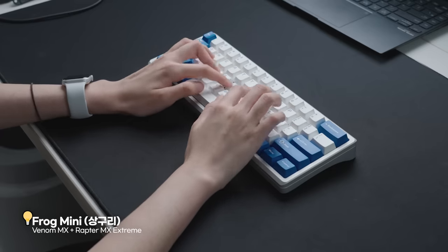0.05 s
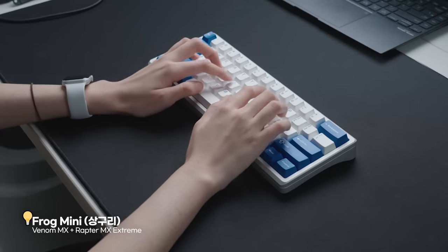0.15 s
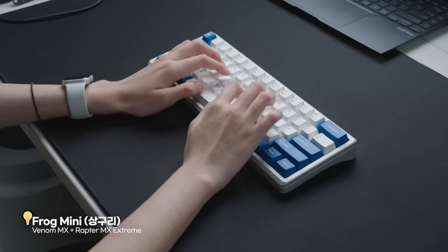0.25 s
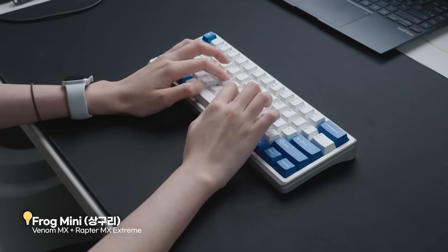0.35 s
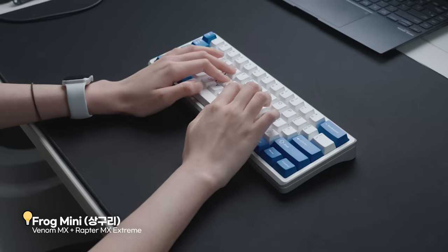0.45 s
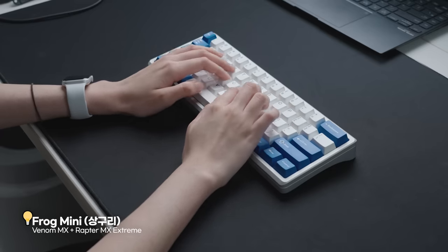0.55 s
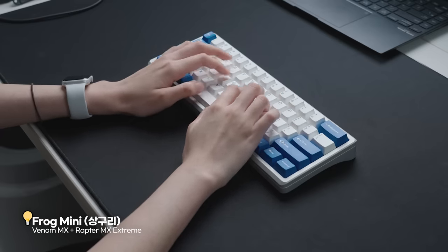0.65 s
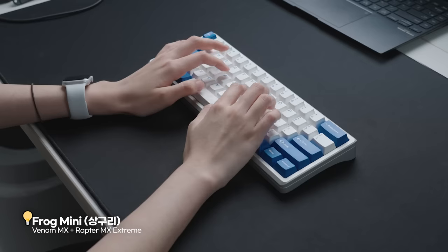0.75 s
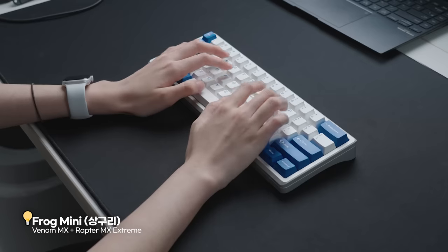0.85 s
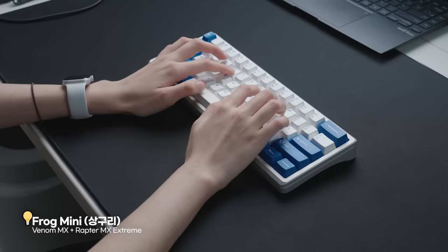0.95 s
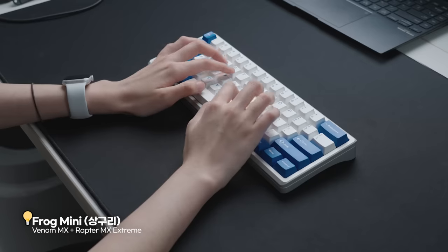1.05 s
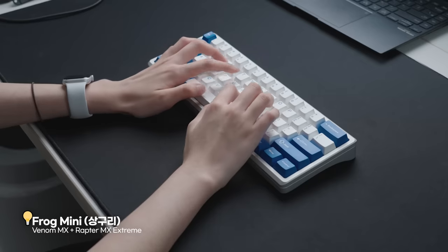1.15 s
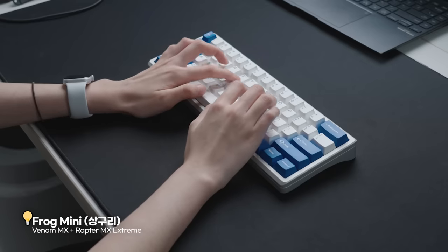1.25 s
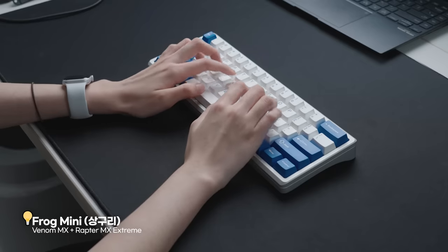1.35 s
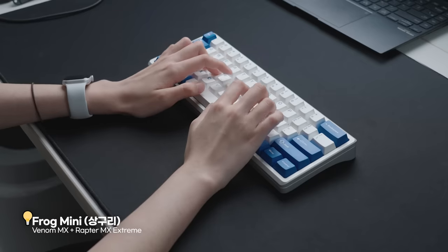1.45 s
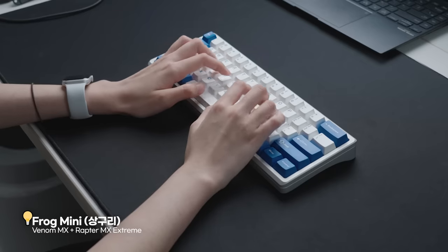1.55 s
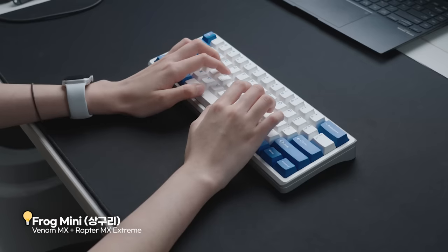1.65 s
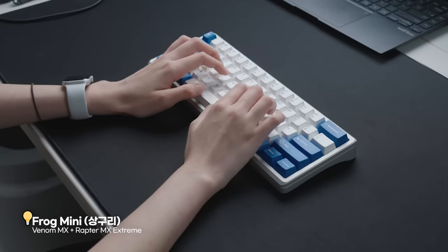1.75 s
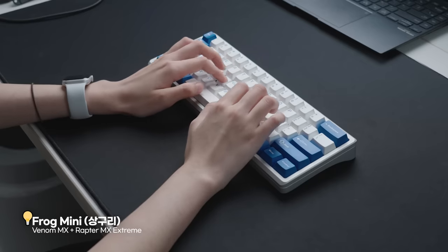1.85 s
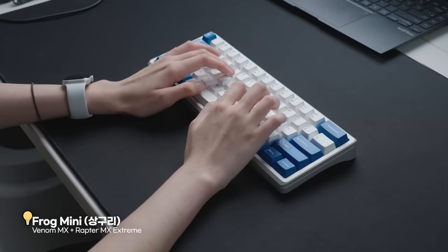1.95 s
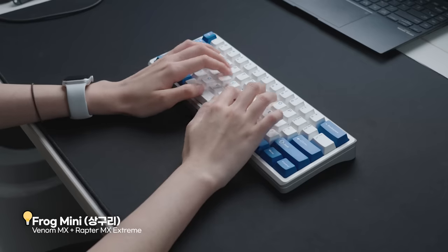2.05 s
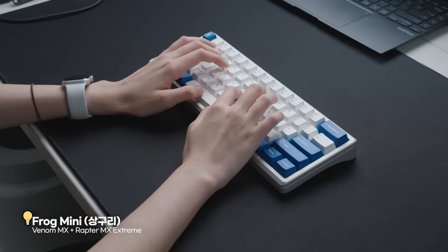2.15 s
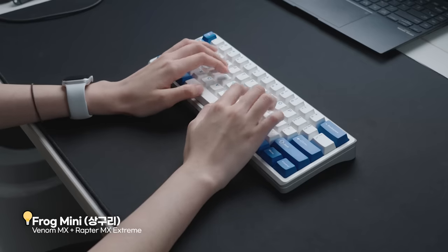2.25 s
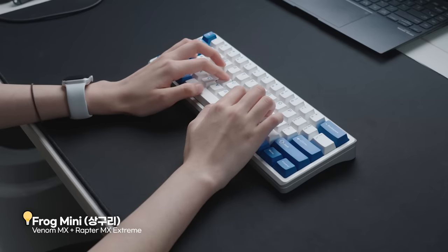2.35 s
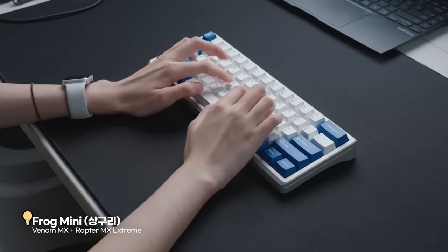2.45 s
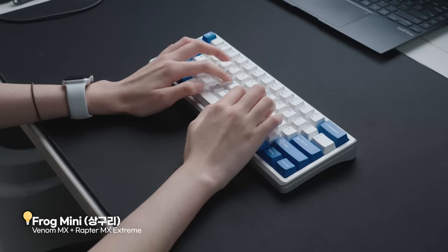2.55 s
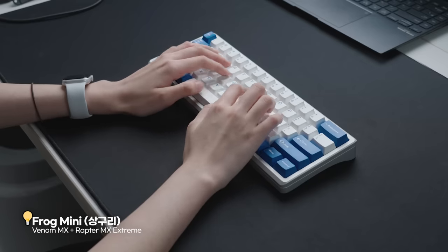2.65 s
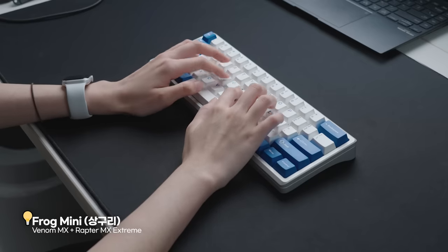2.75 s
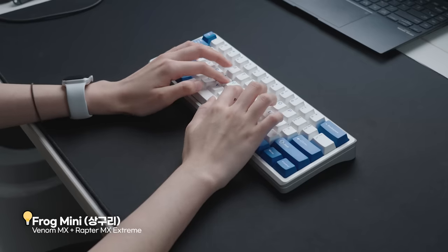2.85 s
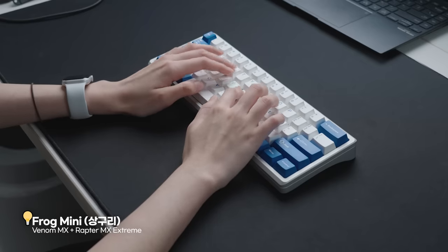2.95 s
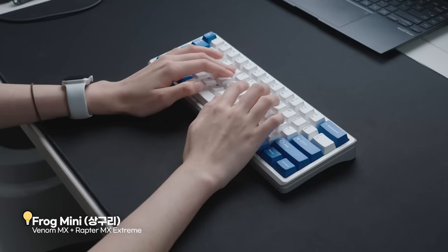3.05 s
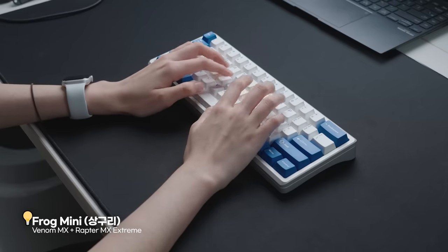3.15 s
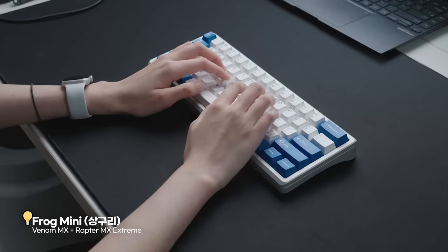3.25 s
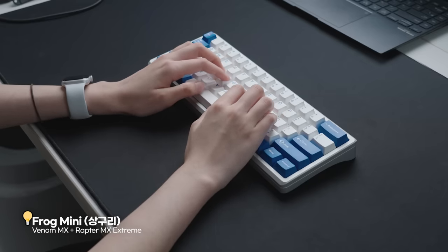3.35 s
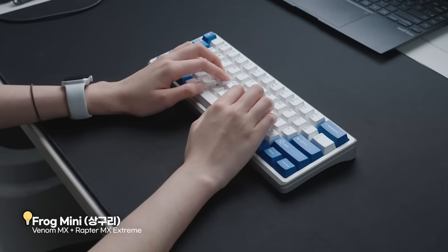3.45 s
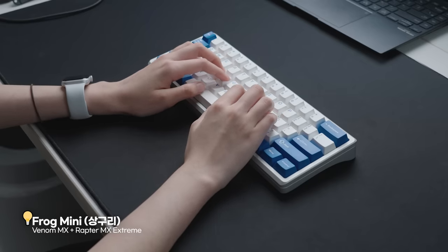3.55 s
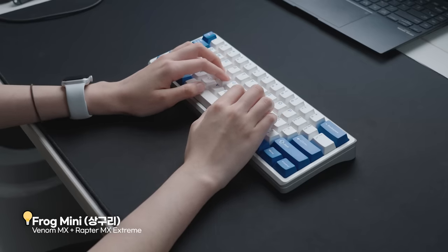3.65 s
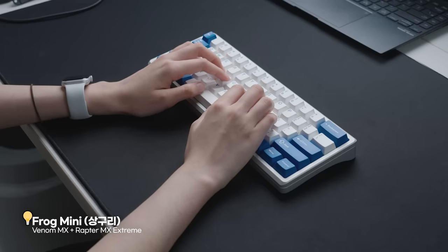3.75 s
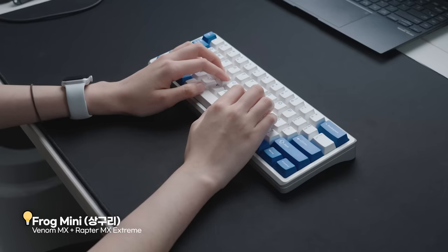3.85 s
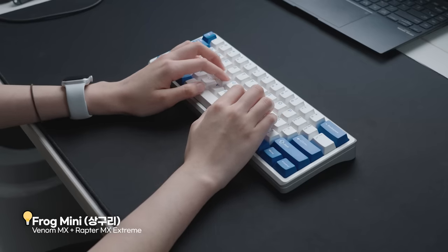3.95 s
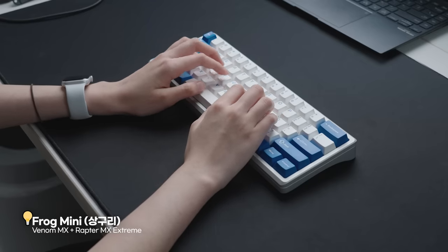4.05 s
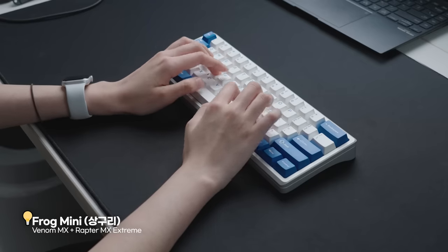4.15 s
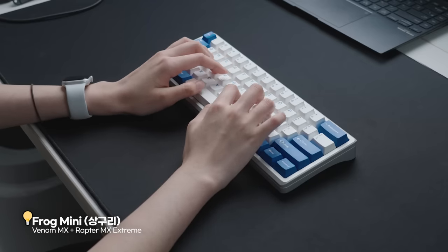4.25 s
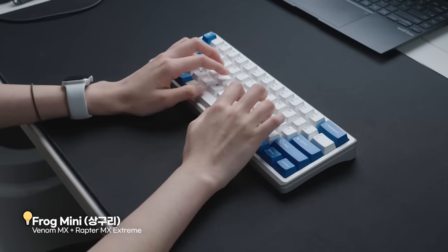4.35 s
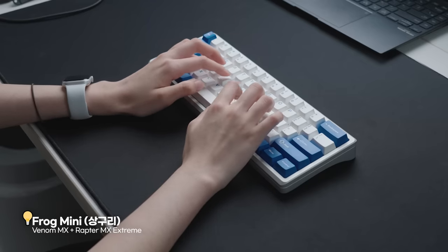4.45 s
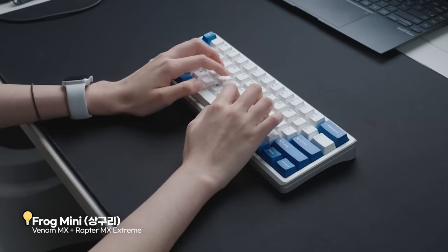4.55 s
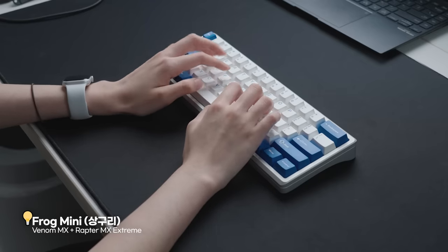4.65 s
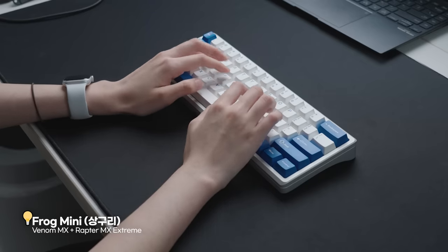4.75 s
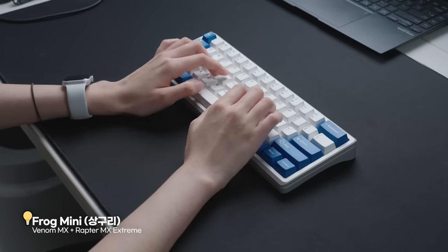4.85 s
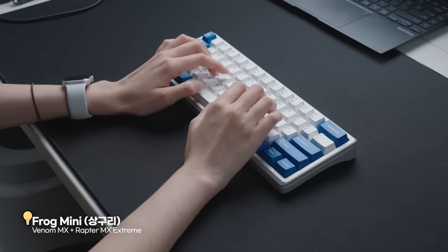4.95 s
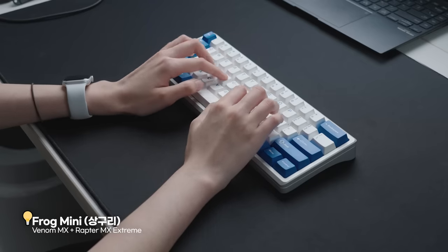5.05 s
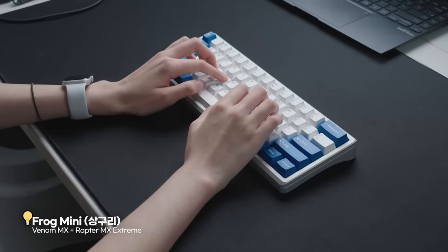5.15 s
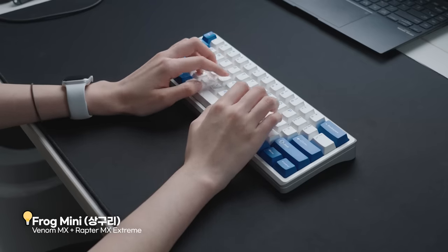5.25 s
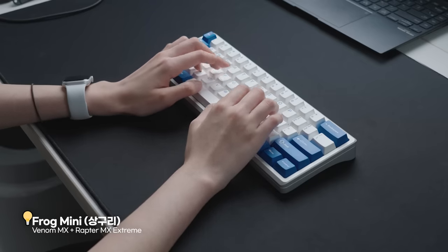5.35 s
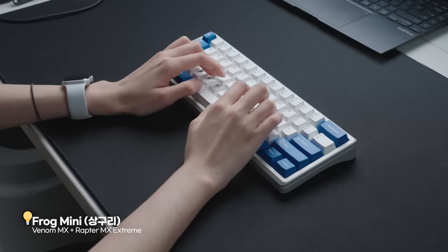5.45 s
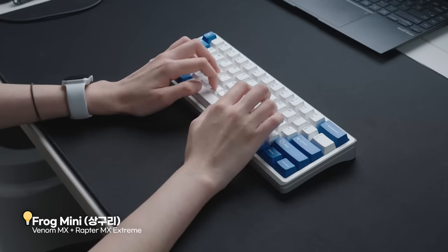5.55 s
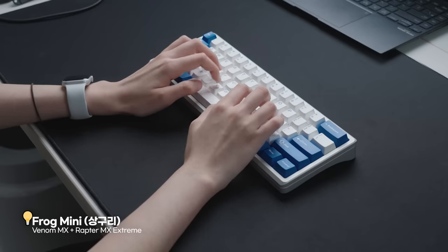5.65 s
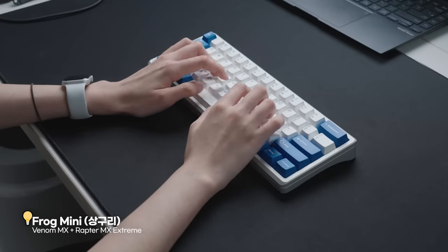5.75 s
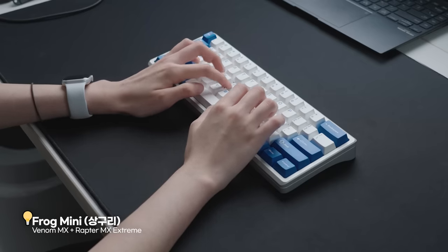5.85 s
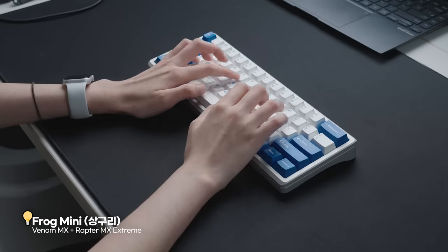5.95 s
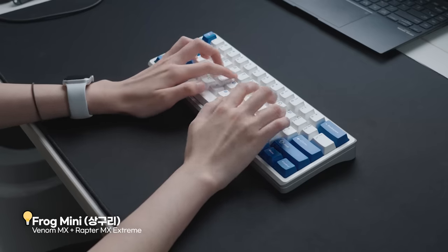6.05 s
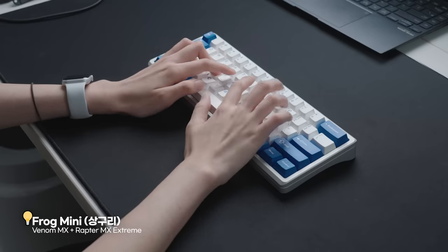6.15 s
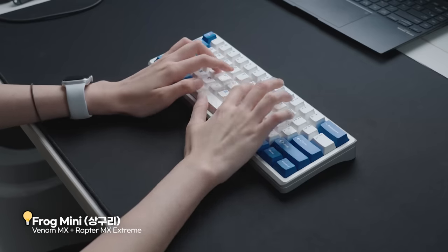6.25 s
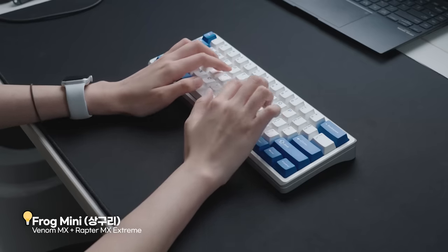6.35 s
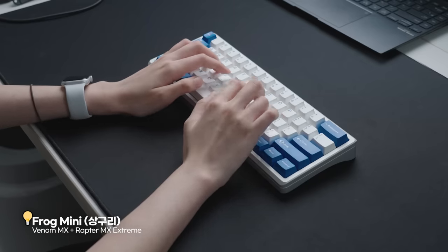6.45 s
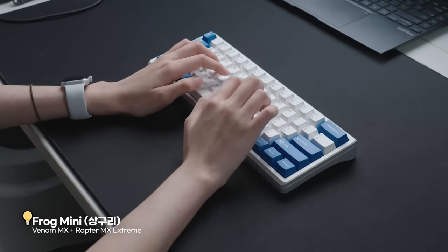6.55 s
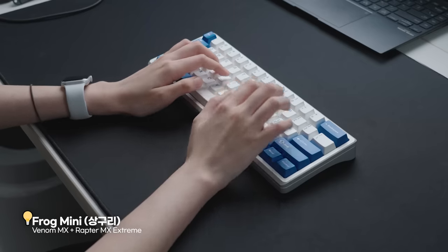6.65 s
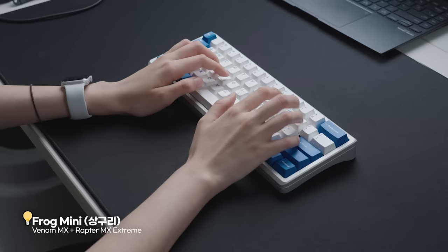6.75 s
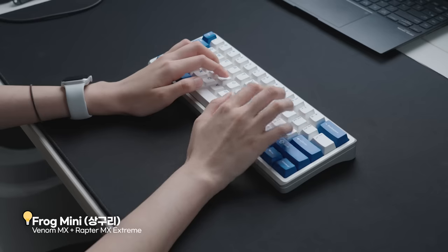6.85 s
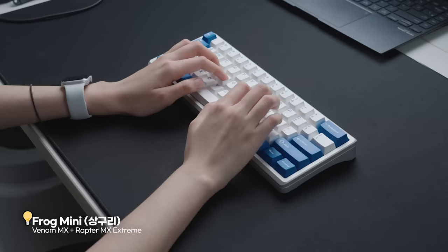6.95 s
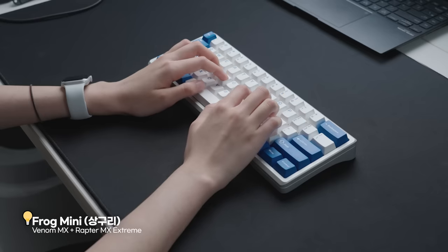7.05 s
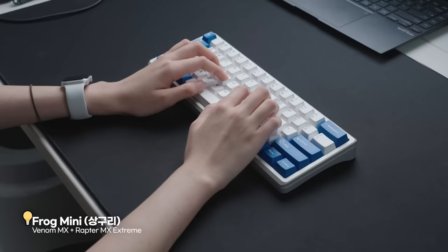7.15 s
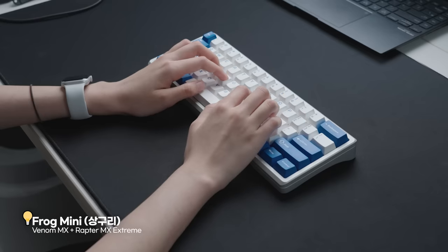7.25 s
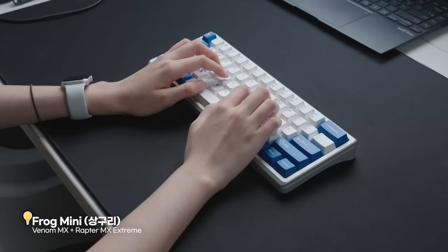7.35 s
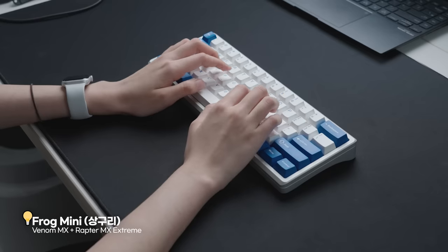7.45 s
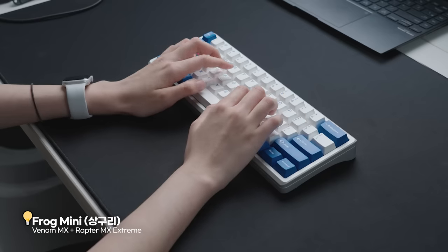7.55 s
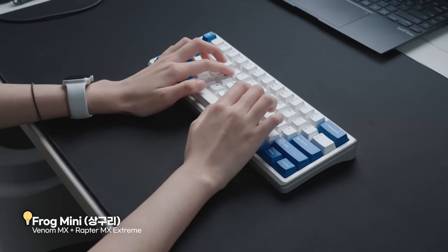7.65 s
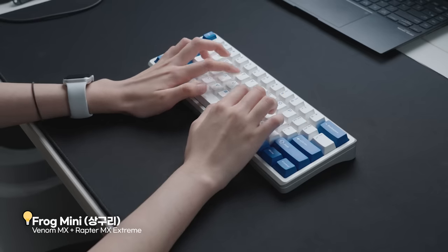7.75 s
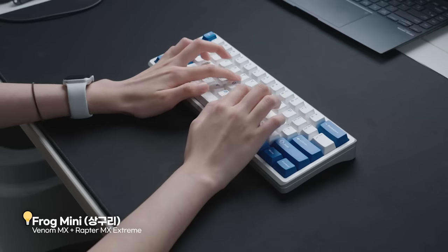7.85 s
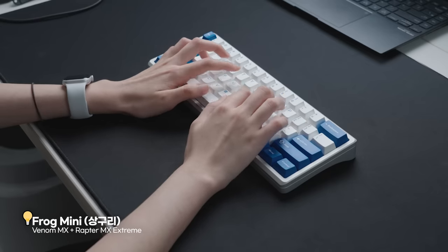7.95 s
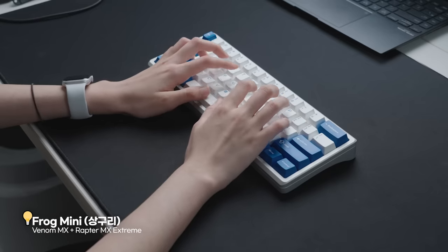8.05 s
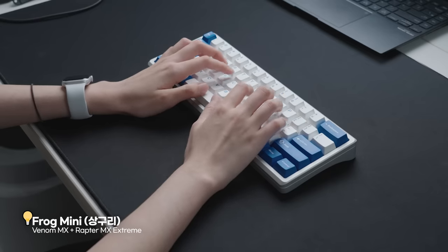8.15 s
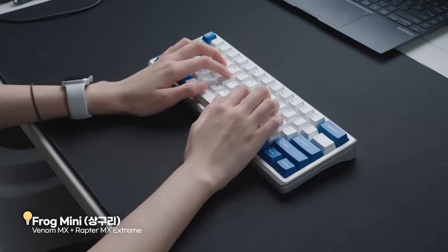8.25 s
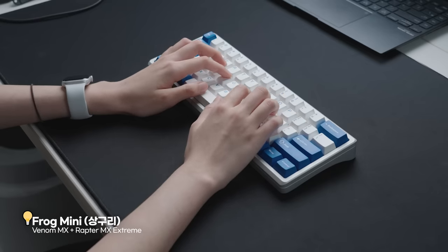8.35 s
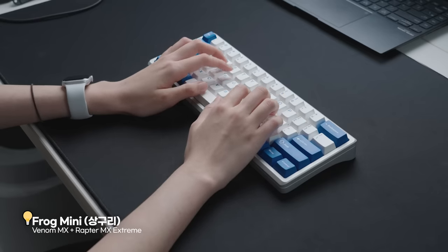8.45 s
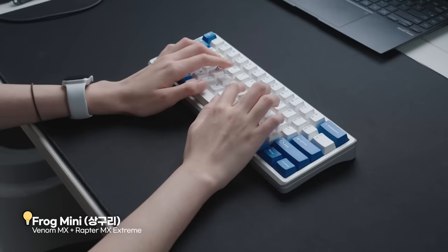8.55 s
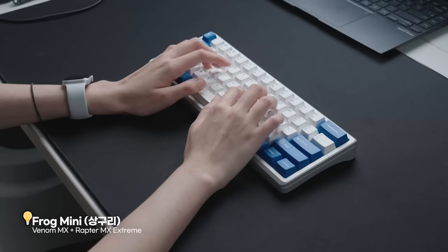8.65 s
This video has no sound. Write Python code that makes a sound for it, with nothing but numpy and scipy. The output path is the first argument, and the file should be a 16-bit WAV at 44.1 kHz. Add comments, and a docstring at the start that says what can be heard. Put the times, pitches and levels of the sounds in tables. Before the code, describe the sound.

Fast typing on a small mechanical keyboard, crisp bright clacks with occasional deeper thocks and brief pauses, recorded close in a quiet room.

```python
"""Soft room hum and hiss, then at once quick typing on a small mechanical keyboard, close to one microphone.
Keycaps clack for a few milliseconds as damped sines over case, stem ticks and a faintly ringing plate.
Long keys thock lower; the desk thumps under the blows. Clacks bounce between desk and ceiling.
Faint finger ticks and one soft rustle are filtered noise and random clicks; hum and hiss are shaped noise."""
import sys
import numpy as np
from scipy import signal
from scipy.fft import rfft, irfft
from scipy.io import wavfile
from scipy.ndimage import uniform_filter1d

SR = 44100
rng = np.random.default_rng(int(sys.argv[2]) if len(sys.argv) > 2 else 0)


def file_out(sig):
    """Save sig as 16-bit WAV at sys.argv[1]."""
    # one column per channel
    cols = np.atleast_2d(sig).T
    # limit, then scale
    lim = np.clip(cols, -1, 1)
    pcm = np.round(lim * 32767).astype(np.int16)
    wavfile.write(sys.argv[1], SR, pcm)


N = 384111

# room and microphone noise spectrum, relative: freq_hz, level_db
AIR_SPECTRUM = [(12, -53.5), (20, -25), (40, -2), (55, 3), (91, -6), (169, -2), (195, -5.5), (289, -10.5),
                (492, -18), (551, -20.5), (1740, -35), (3200, -36), (6000, -44), (15200, -46.5),
                (16500, -62.5)]
AIR_RMS_DB = -54
# wavering hum tones: freq_hz, width_hz (full, at half amplitude), rms_db
HUM_TONES = [(67.4, 11, -61.5), (117.5, 14, -59), (164.6, 4.6, -71.5), (289, 3.4, -71)]

# landing, return or brush of a small key: start_s, level_db, pitch_hz (nominal), stem_db (relative to cap)
SMALL_KEYS = [(.014,-33,3280,-4),(0.035,-5,3050,-8),(0.0755,-19.5,3300,-10),(.0948,-36,3350,1),(0.1073,-5,3430,-8),(.137,-30,3250,-20),(0.1767,-36.5,3310,-2),(0.1915,-7,3390,-9.5),(0.199,-22.5,3220,-6),(0.243,-30,3250,-11.5),(.2644,-3,2970,-7),(0.2685,-16.5,3040,-10),(.36,-22.5,3060,-10.5),(.379,-9,3240,-7),(.4389,-5,3210,-10),(.4605,-16.5,3180,-8.5),(0.5026,-8,3200,-9.5),(.551,-41,3300,6),(.5942,-14.5,3650,-5),(.6344,-31.5,2900,-8.5),(.6476,-8.5,3260,-6.5),(0.7703,-18.5,3100,-9.5),(0.8825,-9.5,3420,-9.5),(.9491,-7,3350,-10.5),(1.0266,-17,3400,-11.5),(1.0354,-17,2930,-4),(1.107,-14,3000,-7.5),(1.1318,-3,3240,-7.5),(1.185,-9.5,3140,-8.5),(1.219,-18,3130,-17),(1.2552,-26,3200,-2.5),(1.272,-17.5,3030,-10),(1.2831,-15.5,3630,-10),(1.3535,-14.5,2910,-8),(1.3605,-11.5,3430,-8.5),(1.392,-35,3250,-11),(1.4211,-10.5,3340,-9.5),(1.4377,-20.5,3000,-6),(1.4652,-7,3220,-9),(1.5368,-32.5,3300,-14.5),(1.5461,-4.5,3100,-9.5),(1.5831,-14.5,3170,-13),(1.654,-19.5,3040,-11),(1.708,-9,3250,-11.5),(1.7713,-4.5,3060,-7.5),(1.799,-30.5,2900,-20),(1.8466,-33,3300,-8),(1.8574,-18.5,2700,-6.5),(1.8654,-7.5,3200,-11.5),(1.9278,-17,3230,-3.5),(1.9453,-22,3200,-18),(1.964,-16.5,3230,-6),(2.014,-9.5,3170,-10.5),(2.0253,-7.5,3180,-9.5),(2.1012,-37,3600,5),(2.1116,-18,3040,-13),(2.1272,-16,3730,-4.5),(2.1643,-31,3080,-15.5),(2.235,-18,3200,-11.5),(2.2548,-9.5,3230,-9),(2.3196,-24,3510,8),(2.3362,-7,3220,-6.5),(2.414,-5.5,3130,-9.5),(2.4756,-9,3010,-14.5),(2.5327,-37,3500,7.5),(2.5468,-4,3460,-8.5),(2.6151,-17,3040,-7),(2.6657,-35.5,3250,-4),(2.6837,-4.5,3200,-5),(2.7667,-16.5,3100,-8.5),(2.8127,-13,3460,-4.5),(2.8342,-31,3300,-5),(2.8686,-9.5,3280,-11),(2.8822,-12,3240,-13),(2.9617,-14.5,3000,-12.5),(2.9923,-20,3560,-5),(3.0474,-7,3170,-11.5),(3.0699,-18,3130,-3),(3.1745,-23.5,3020,-17),(3.1852,-25.5,3000,-8),(4.1979,-32,3600,-1),(4.2169,-8,3160,-7.5),(4.2804,-6,3170,-8.5),(4.3142,-21,3120,-16.5),(4.3267,-36.5,3270,-20.5),(4.3493,-10,3150,-5),(4.3974,-20.5,3160,-7),(4.446,-16.5,3240,-12),(4.4597,-5,3190,-12),(4.5388,-22,3500,-1),(4.5545,-28,2960,-20),(4.5668,-8.5,3180,-7.5),(4.6404,-14.5,3330,-13),(4.694,-21,3200,-15),(4.699,-2.5,3060,-9),(4.7902,-6.5,3380,-10.5),(4.814,-24.5,3470,2),(4.832,-8.5,3150,-7),(4.8588,-36,3300,-14),(4.8884,-23,3480,-5),(4.902,-7,3200,-8.5),(4.9638,-15.5,2830,-8),(4.9701,-12.5,3130,-14),(5.0298,-5.5,3150,-8.5),(5.0578,-16.5,3140,-0.5),(5.0968,-11,3300,-14),(5.1542,-4,3260,-11.5),(5.2324,-13,3250,-18.5),(5.2515,-20,3050,-23.5),(5.3466,-10,3270,-15.5),(5.3938,-8.5,3160,-6.5),(5.4174,-18,3040,-12.5),(5.4542,-34.5,3300,-5),(5.4713,-14,2810,-6),(5.476,-3.5,3180,-9),(5.5477,-4.5,3040,-7.5),(5.5624,-21,3400,-20.5),(5.611,-14,3170,0.5),(5.6141,-15,3230,-18),(5.6258,-8,3160,-11),(5.6927,-5.5,3070,-7),(5.6957,-12,3260,-10),(5.747,-34,3300,-1.5),(5.7737,-4.5,3270,-8),(5.8377,-22.5,3000,-25),(5.872,-25,3070,-17),(5.878,-40,3170,-0.5),(5.9113,-11.5,3640,-2),(5.9452,-8.5,3220,-6.5),(5.9495,-10.5,2840,-1.5),(6.0127,-13.5,2600,-6),(6.0237,-32.5,3310,-3),(6.0503,-15,3360,-10),(6.061,-32,3300,-15.5),(6.0914,-8,3300,-8),(6.1235,-21,3080,-14.5),(6.151,-26,3220,-2.5),(6.1752,-3.5,3180,-9),(6.1892,-21.5,3250,-10.5),(6.252,-42,3290,-1),(6.2664,-8.5,3300,-9.5),(6.3044,-26,3200,-21),(6.3662,-19,3150,-9),(6.4876,-19.5,2870,2.5),(6.508,-11.5,3160,-12.5),(6.5725,-17,2660,-9),(6.7707,-34.5,3250,-4),(7.089,-42.5,3330,-5),(7.5,-48,3300,-1),(7.5493,-9.5,3360,-11.5),(7.6048,-6,3170,-8),(7.6256,-15.5,3250,-16),(7.6656,-31.5,3600,0.5),(7.671,-16.5,3230,-14),(7.6854,-11.5,3270,-9.5),(7.7249,-28.5,3380,2),(7.759,-6.5,3290,-4),(7.8418,-16.5,3140,-4),(7.849,-33.5,3180,3),(7.86,-6.5,3320,-23),(7.9399,-22.5,3020,-12),(7.9952,-11,3520,-7),(8.0702,-12.5,2880,-8),(8.2577,-39,3500,-10),(8.5663,-33.5,3400,0),(8.5863,-6,3200,-9),(8.6424,-31,3400,1),(8.6599,-10,3250,-7),(8.7012,-25,3420,-9)]
# keycap modes: pitch_ratio, level_db
CAP_MODES = [(0.822, -6.5), (1, 14), (1.2, -3)]
# keyboard case modes: freq_hz, level_db, t60_s
CASE_MODES = [(890, -8, 0.024), (1465, 11.5, 0.0046), (1910, -1, 0.021), (2520, -17.5, .005)]
# key stem modes: freq_hz, level_db, t60_s
STEM_MODES = [(4100, -5.5, 0.0033), (5500, -11.5, 0.0043), (6036, 0, 0.0033), (7235, -3.5, 0.0035),
              (8380, -15, 0.0056), (10263, -1.5, 0.003), (12520, -11.5, 0.0031), (13650, -7.5, 0.00077),
              (14600, -11, 0.0012)]
# case level beside the cap: full_force_db, slope_db_per_db (gained per dB of softness)
CASE_LEVEL = (-31.5, 0.93)
# typical cap decay before fingertip damping; log-normal spread
CAP_DECAY_DB_PER_MS, DECAY_LOG_SPREAD = 18, 0.33
# blow-to-blow standard deviations, at spread 1
SCATTER_DB, DETUNE_RATIO = 2.0, 0.025
# a small cap pushes little air at low pitch
CLACK_HIGHPASS = signal.butter(2, 1100, "highpass", fs=SR)

# metal plate under the keys: freq_hz, level_db, t60_s
PLATE_MODES = [(3160, -72, 0.16), (3250, -71.5, 0.16), (3360, -70, 0.16), (3480, -69, 0.16)]

# echoes off nearby things, before treble loss: delay_s, level_db
NEAR_ECHOES = [(.0045, -35.5), (0.016, -37)]
# desk-ceiling echoes, before treble loss: round_trip_s, first_db, loss_db (per trip)
DESK_CEILING = (.01165, -21, -8)
# room decay: freq_hz, t60_s
ROOM_DECAY = [(500, 0.9), (1500, 0.16), (3300, 0.2), (7000, 0.25), (14000, 0.1)]
TAIL_NORM_DB = -23

# desk modes: freq_hz, level_db, t60_s
DESK_MODES = [(60.4, -14, 0.1), (84.04, -0.5, .2), (113.6, -2.5, 0.12)]

# hand shifting over the caps: center_s, spread_s, level_db
HAND_RUSTLE = (7.02, 0.024, -71)

# long keys, thumb or little finger: start_s, level_db, hardness_db_per_octave, hollow_db, stem_db
LONG_STROKES = [(.7081, -14, 2, -25, -9.5), (.8233, -25.5, -18, -20, -30),
                (1.6037, -8.5, 3.5, -29.5, -10.5), (2.1976, -17.5, -0.5, -26, -9),
                (3.2068, -13, 4, -27, -9.5), (3.2896, -27.5, -26, -25, -22), (4.4937, -20, -11.5, -21, -27),
                (5.3025, -25.5, -11.5, -17.5, -22.5), (5.7917, -6, 5.5, -28, -10.5),
                (6.7951, -11.5, 16, -20.5, -7), (6.8725, -25, 10, -8.5, -20),
                (8.1015, -4.5, 3.5, -25.5, -8), (8.1995, -24, -20, -31, -30)]
# long keycap modes: freq_hz, level_db, t60_s
LONG_CAP_MODES = [(238, -19, 0.035), (535, -19, 0.011), (1100, -10.5, 0.0013), (1320, -8, 0.0018),
                  (1590, 2, 0.0067), (2030, 7, 0.0045), (2580, 2.5, 0.0048), (3020, 2, 0.0064)]
# air under a long cap: freq_hz, level_db, t60_s
HOLLOW_MODES = [(698.5, 3, 0.016), (820, -11.5, 0.064)]

BAND_EDGE_HZ = 16850


def gain_of(db):
    """Decibels to amplitude."""
    return 10 ** (np.asarray(db) / 20)


def evened(x):
    """Scale to unit RMS."""
    return x / np.sqrt(np.mean(x ** 2) + 1e-20)


def read(points, hz):
    """Interpolate a curve over log frequency."""
    point_hz, value = np.transpose(points)
    return np.interp(np.log(hz + 1), np.log(point_hz + 1), value)


def add(mix, start_s, sound):
    """Add a sound into the mix in place, cut at the end."""
    part = mix[max(round(start_s * SR), 0):][:len(sound)]
    part += sound[:len(part)]


def ring(modes, t, rise_s, spread=1):
    """Decaying sines with random level and pitch shifts, peak scaled to 1."""
    hz, db, t60_s = np.transpose(modes)[:, :, None]
    level_luck, pitch_luck = spread * rng.standard_normal((2, len(modes), 1))
    envelope = gain_of(db + SCATTER_DB * level_luck - 60 * t / t60_s)
    tones = envelope * np.sin(2 * np.pi * hz * (1 + DETUNE_RATIO * pitch_luck) * t)
    sound = tones.sum(0) * (1 - np.exp(-(t / rise_s) ** 2))
    return sound / abs(sound).max()


def air():
    """Steady rumble and hiss of room and microphone, plus narrow-band noise heard as wavering tones."""
    hz = np.fft.rfftfreq(N, 1 / SR)
    hiss = irfft(rfft(rng.standard_normal(N)) * gain_of(read(AIR_SPECTRUM, hz)), N)
    out = gain_of(AIR_RMS_DB) * evened(hiss)
    for center_hz, width_hz, rms_db in HUM_TONES:
        resonance = 1 / (1 + (2 * (hz - center_hz) / width_hz) ** 2)
        tone = irfft(rfft(rng.standard_normal(N)) * resonance, N)
        out += gain_of(rms_db) * evened(tone)
    return out


def stem_and_rattle(body, stem_db):
    """The stem ticks with the blow; a short noise tail of rattling plastic follows."""
    t = np.arange(len(body)) / SR
    blow = body + gain_of(stem_db) * ring(STEM_MODES, t, rise_s=0.00021, spread=1.56)
    rattle = gain_of(-21.5 - 60 * t / 0.011) * rng.standard_normal(len(t))
    return blow + signal.fftconvolve(blow, rattle)[:len(t)]


def clack(cap_hz, decay_db_per_ms, case_db, stem_db):
    """A small cap rings for a few cycles over the hollow case."""
    t = np.arange(1024) / SR
    t60_s = 0.06 / max(decay_db_per_ms, 1)
    modes = [(ratio * cap_hz, db, t60_s) for ratio, db in CAP_MODES]
    cap = ring(modes, t, rise_s=0.0004, spread=0.5)
    # the fingertip settles on the cap and smothers it
    cap *= np.exp(-(t / 0.002) ** 2)
    case = gain_of(case_db) * ring(CASE_MODES, t, rise_s=0.00042)
    return signal.lfilter(*CLACK_HIGHPASS, stem_and_rattle(cap + case, stem_db))


def small_key(level_db, cap_hz, stem_db):
    """The harder the blow, the more the cap outshouts the case; cap decay varies by chance."""
    decay_db_per_ms = CAP_DECAY_DB_PER_MS * np.exp(DECAY_LOG_SPREAD * rng.standard_normal())
    full_force_db, slope = CASE_LEVEL
    case_db = min(full_force_db - slope * level_db, -8)
    return clack(cap_hz, decay_db_per_ms, case_db, stem_db)


def plate(x):
    """The mounting plate rings on faintly at its own fixed modes after every blow."""
    t = np.arange(SR // 4) / SR
    hz, db, t60_s = np.transpose(PLATE_MODES)[:, :, None]
    tones = gain_of(db - 60 * t / t60_s) * np.sin(2 * np.pi * hz * t)
    return signal.oaconvolve(x, tones.sum(0))[:N]


def room(x):
    """Single and fluttering echoes, plus sparse random-sign taps that die band by band."""
    taps = np.zeros(SR // 2)
    slots = np.arange(100, len(taps) - 20, 20)
    taps[slots + rng.integers(0, 20, len(slots))] = rng.choice([-1., 1.], len(slots))
    hz, t, spectrum = signal.stft(taps, SR, nperseg=256)
    decay = gain_of(-60 * t / read(ROOM_DECAY, hz)[:, None])
    tail = signal.istft(spectrum * decay, SR, nperseg=256)[1]
    tail *= gain_of(TAIL_NORM_DB) / np.linalg.norm(tail)

    trip_s, first_db, loss_db = DESK_CEILING
    flutter = [((k + 1) * trip_s, first_db + k * loss_db) for k in range(10)]
    echoes = np.zeros(len(tail))
    for delay_s, db in NEAR_ECHOES + flutter:
        add(echoes, delay_s, gain_of([db]))
    # soft surfaces swallow the treble of each echo
    echoes = signal.lfilter(*signal.butter(2, 5500, fs=SR), echoes)
    return signal.oaconvolve(x, tail + echoes)[:N]


def desk_thump(level_db):
    """Low desk modes swing up slowly; harder blows thump louder."""
    t = np.arange(SR // 4) / SR
    return gain_of(0.62 * level_db - 33.5) * ring(DESK_MODES, t, rise_s=0.0069)


def fidget():
    """Faint random finger ticks around close keystrokes, and one soft rustle of noise through a clack."""
    strokes = np.zeros(N)
    strokes[(np.array(SMALL_KEYS)[:, 0] * SR).astype(int)] = SR
    # over 15 blows per s: at least two within a tenth of a second
    busy = uniform_filter1d(strokes, SR // 10) > 15
    ticking = np.zeros(N)
    for _ in range(8):
        chance = rng.random(N) < 4.0 / SR  # 4 per s
        ticks = busy * chance * gain_of(3.5 * rng.standard_normal(N))
        cap_hz = 3200 + 400 * rng.standard_normal()
        tick = clack(cap_hz, 14, 0.5, rng.uniform(-12.0, 3.6))
        ticking += signal.oaconvolve(ticks, tick)[:N]
    center_s, spread_s, rustle_db = HAND_RUSTLE
    rub = evened(signal.oaconvolve(rng.standard_normal(N), clack(3000, 34, -15, -4))[:N])
    swell = np.exp(-((np.arange(N) / SR - center_s) / spread_s) ** 2)
    return gain_of(-51) * ticking + gain_of(rustle_db) * rub * swell


def long_key(hardness_db_per_octave, hollow_db, stem_db):
    """A long cap has low modes over hollow air; a soft blow hardly wakes the upper ones."""
    t = np.arange(2048) / SR
    modes = [(hz, db + hardness_db_per_octave * max(np.log2(hz / 1200), 0), t60_s)
             for hz, db, t60_s in LONG_CAP_MODES]
    body = ring(modes, t, rise_s=0.0002, spread=0.5)
    body += gain_of(hollow_db) * ring(HOLLOW_MODES, t, rise_s=0.0004, spread=0.5)
    return stem_and_rattle(body, stem_db)


def keys():
    """Place every key blow, each followed 4 ms later by its desk thump."""
    clacks, thumps = np.zeros((2, N))
    for start_s, level_db, cap_hz, stem_db in SMALL_KEYS:
        add(clacks, start_s, gain_of(level_db) * small_key(level_db, cap_hz, stem_db))
        add(thumps, start_s + 0.004, desk_thump(level_db))
    for start_s, level_db, hardness, hollow_db, stem_db in LONG_STROKES:
        add(clacks, start_s, gain_of(level_db) * long_key(hardness, hollow_db, stem_db))
        add(thumps, start_s + 0.004, desk_thump(level_db))
    return clacks, thumps


def scene():
    """Keys, fidgeting and plate with their echoes, plus desk and air; one channel."""
    clacks, thumps = keys()
    clacks = clacks + fidget()
    clacks = clacks + plate(clacks)
    return (clacks + room(clacks) + thumps + air())[None]


def record(dry):
    """Limit the band with a linear-phase lowpass."""
    lowpass = signal.firwin(255, BAND_EDGE_HZ, window=("kaiser", 9), fs=SR)
    return signal.oaconvolve(dry, lowpass[None], "same")


dry = scene()
out = record(dry)
file_out(out)
```